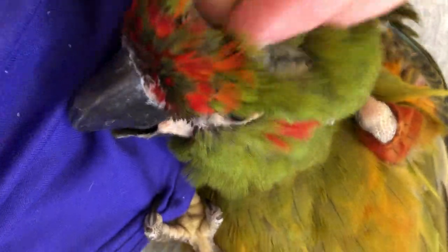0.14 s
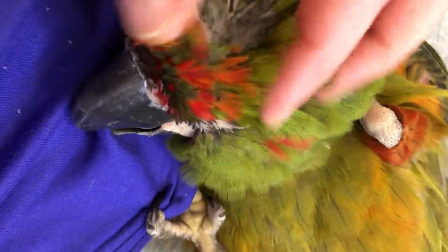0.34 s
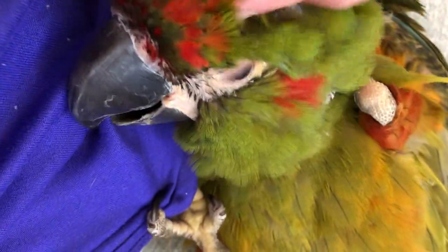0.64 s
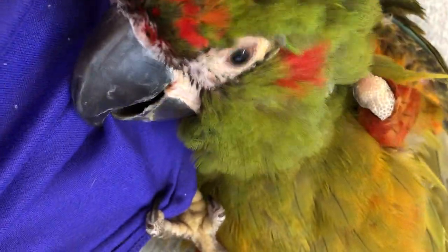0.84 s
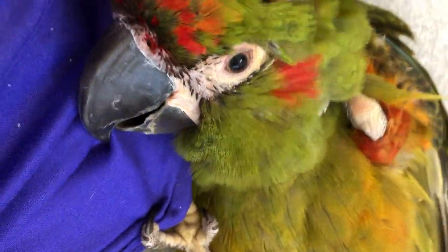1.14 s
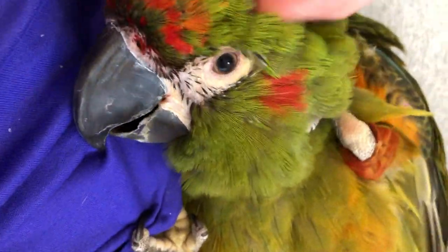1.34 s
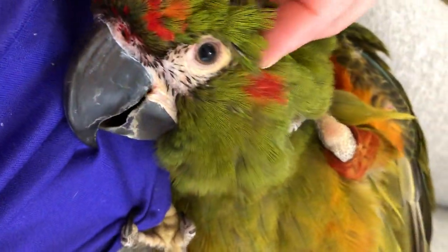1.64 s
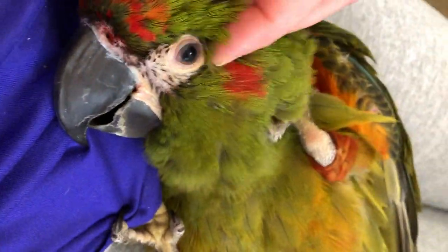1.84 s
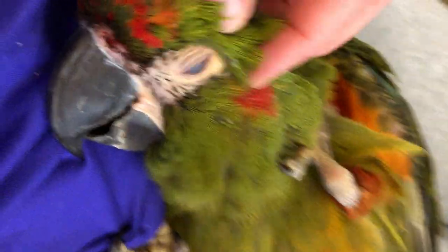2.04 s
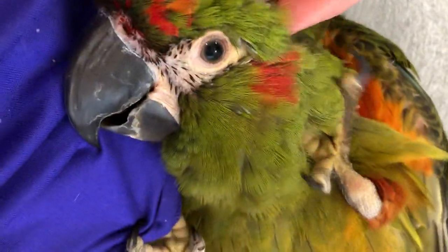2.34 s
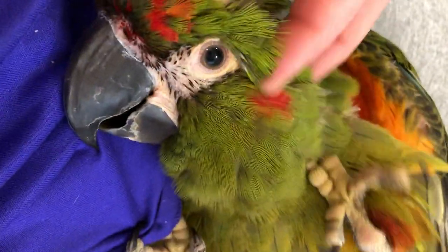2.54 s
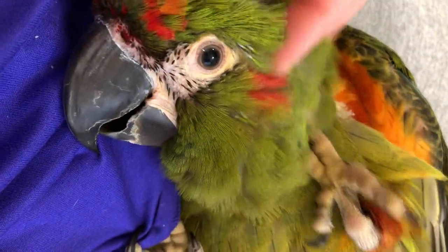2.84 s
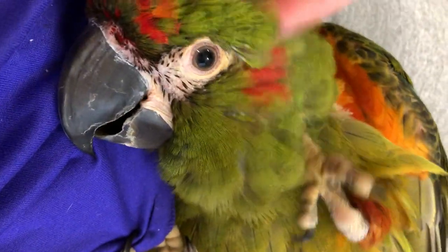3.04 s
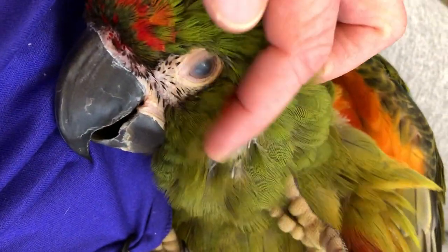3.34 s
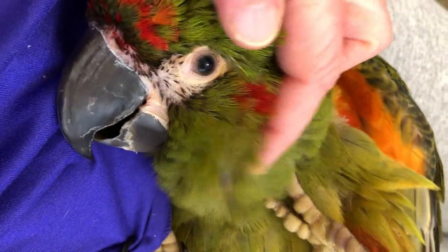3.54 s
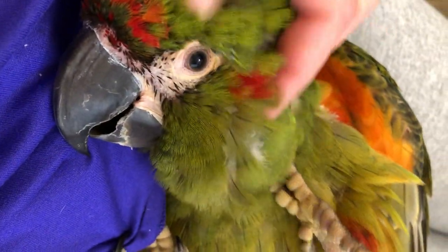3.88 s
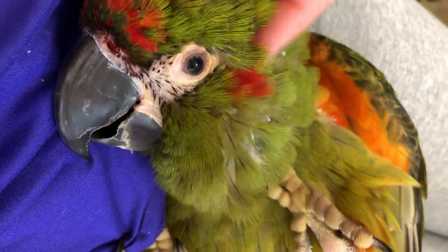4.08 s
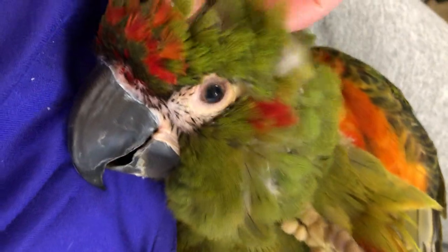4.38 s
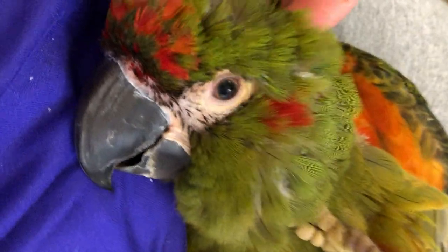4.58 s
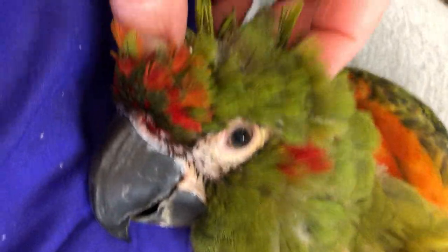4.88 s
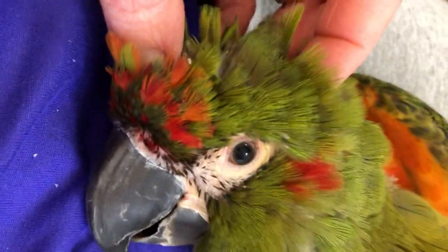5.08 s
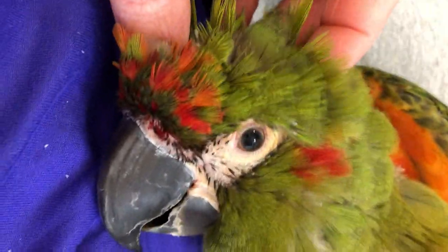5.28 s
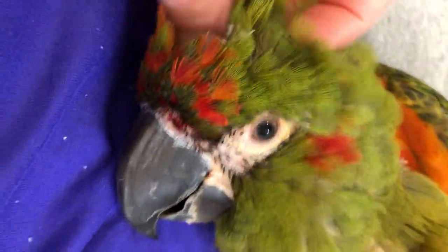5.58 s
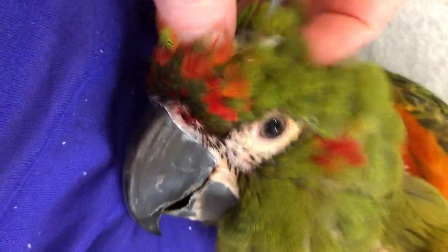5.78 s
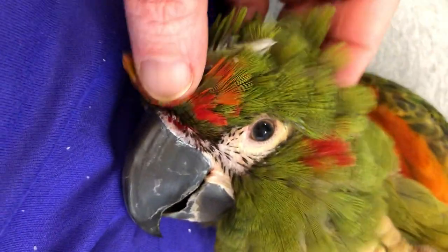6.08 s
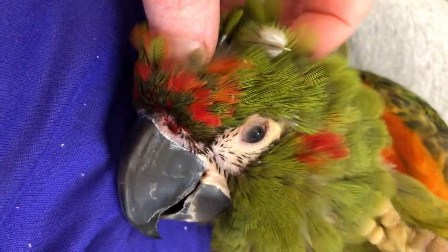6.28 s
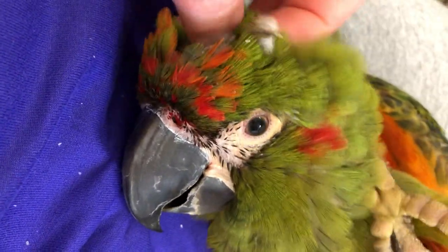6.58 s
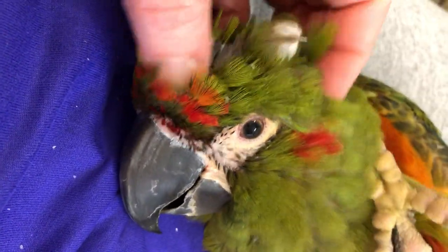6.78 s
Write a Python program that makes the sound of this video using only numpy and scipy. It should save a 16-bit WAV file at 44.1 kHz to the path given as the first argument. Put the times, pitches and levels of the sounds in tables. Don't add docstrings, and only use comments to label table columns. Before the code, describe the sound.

A quiet, hard-walled room with faint mains hum, low rumble and soft hiss. Light feather rubbing, ticks and knocks come first, close up; a sharp tick leads to two hard thumps and a softer one, ringing off the walls. After a lull, a young parrot peeps faintly, then louder, and squawks three times at an even pace, high and breathy. Afterwards only faint creaks, brushes and small bumps remain.

```python
import sys
import numpy as np
from scipy import signal
from scipy.io import wavfile
from scipy.ndimage import uniform_filter1d

SR = 44100
rng = np.random.default_rng(int(sys.argv[2]) if len(sys.argv) > 2 else 0)


def pcm_store(signal):
    levels = np.round(np.clip(np.atleast_2d(signal), -1, 1) * 32767)
    wavfile.write(sys.argv[1], SR, levels.astype(np.int16).T)


def decibels_to_gain(level_db):
    exponent = np.asarray(level_db, float) / 20
    return 10 ** exponent


N = 305172
EDGE_HZ = 15850


def evened(x):
    return x / np.sqrt(np.mean(x ** 2) + 1e-20)


def read(points, hz):
    f, value = np.transpose(points)
    return np.interp(np.log(hz + 1), np.log(f + 1), value)


def curves(rows):
    s, *columns = np.transpose(rows)
    t = np.arange(s[0], s[-1], 1 / SR)
    return s[0], [np.interp(t, s, column) for column in columns]


def add(mix, s, sound):
    part = mix[round(s * SR):][:len(sound)]
    part += sound[:len(part)]


def coloured(x, db_of):
    hz = abs(np.fft.fftfreq(4096, 1 / SR))
    log_gain = np.log(decibels_to_gain(np.maximum(db_of(hz), -100)))
    taps = np.fft.ifft(np.exp(np.conj(signal.hilbert(log_gain)))).real[:2048]
    return signal.fftconvolve(x, taps)


def slow(count, width):
    width = max(int(width), 1)
    once = uniform_filter1d(rng.standard_normal(count), width)
    return evened(uniform_filter1d(once, width))


def wash(spectrum, patchy_db, flicker_db):
    frames, hz = N // 128 + 5, np.fft.rfftfreq(512, 1 / SR)
    a, b, patches = rng.standard_normal((frames, 257, 3)).T
    patches = evened(uniform_filter1d(uniform_filter1d(patches, 24, 0), 16, 1))
    level_db = read(spectrum, hz)[:, None] + patchy_db * patches + flicker_db * slow(frames, 4.3)
    z = (a + 1j * b) * decibels_to_gain(level_db)
    return evened(signal.istft(z, nperseg=512, noverlap=384)[1][:N])


# time_s, level_db
STROKING = [(0.0, -57), (.26, -63.5), (.5, -60), (1.05, -65), (1.2, -63.5), (1.8, -67.5), (2.2, -66.5),
            (2.8, -68.5), (3.06, -66), (3.64, -67.5), (4.95, -66), (5.1, -54), (5.3, -73.5), (5.6, -66.5),
            (6.1, -70.5), (6.62, -70), (6.72, -61.5), (6.92, -69)]


def stroking():
    return np.interp(np.arange(N) / SR, *np.transpose(STROKING))


# pitch_hz, level_db
HISS = [(290, -24.5), (500, 2.5), (621, -39.5), (868, -4), (1030, -10.5), (1280, -3.5), (3700, -3),
        (4210, -3.5), (16000, -10)]


def hiss(stroke_db):
    feathers = decibels_to_gain(stroke_db) * wash(HISS, patchy_db=.6, flicker_db=1.2)
    capsule = decibels_to_gain(-79) * wash(HISS, patchy_db=-6.0, flicker_db=-1)
    return feathers + capsule


# pitch_hz, level_db
RUMBLE = [(47, -11.5), (80, 0), (86, -10), (113, -9.5), (247, -11), (371, -12), (409, -19), (651, -17.5),
          (1500, -30), (1950, -45), (3300, -120)]
RUMBLE_DB, RUMBLE_FOLLOWS = -65.5, .25
AFTER_THUMP_DB, AFTER_THUMP_T60_S = -30, 0.69


def rumble(stroke_db):
    t = np.arange(N) / SR
    level = decibels_to_gain(RUMBLE_DB + RUMBLE_FOLLOWS * (stroke_db - stroke_db.mean()))
    for s, peak_db, *_ in THUMPS:
        level += decibels_to_gain(peak_db + AFTER_THUMP_DB - 60 * (t - s) / AFTER_THUMP_T60_S) * (t > s)
    return level * wash(RUMBLE, patchy_db=2.0, flicker_db=1.5)


# centre_s, half_length_s, change_db
HUM_FALTERS = [
    (.0, 0.074, -1),
    (0.217, .05, 6.5),
    (.29, 0.037, -5),
    (.37, 0.028, 4),
    (0.43, 0.031, -6),
    (1.23, .05, -5),
    (2.41, .08, -12),
    (2.65, 0.1, -8),
    (4.56, 0.11, -5),
    (4.717, 0.068, -6),
]
HUM_HZ, HUM_WAVER_HZ, HUM_DB = 59.5, 2.2, -60.5


def hum():
    t = np.arange(N) / SR
    tone = np.sqrt(2) * np.sin(2 * np.pi * np.cumsum(HUM_HZ + HUM_WAVER_HZ * slow(N, 900)) / SR)
    falter_db = sum(db * np.exp(-((t - s) / half) ** 2) for s, half, db in HUM_FALTERS)
    return tone * decibels_to_gain(HUM_DB + falter_db + 1.1 * slow(N, 1500))


def burst(length):
    t = np.arange(4000) / SR
    spray = rng.standard_normal(len(t)) * np.exp(-t / length)
    return spray * np.minimum(t / (0.09 * length), 1)


def contact(peak_db, centre_hz, octaves, length):
    bell = lambda hz: -6 * np.abs(np.log2((hz + 20) / centre_hz) / octaves) ** 1.038
    ring = coloured(burst(length), bell)
    return decibels_to_gain(peak_db) * ring / abs(ring).max()


# start_s, peak_db, centre_hz, room_share_db
THUDS = [(.146, -49.5, 163, 6), (.195, -53, 210, -13), (.78, -54.5, 141, 3.5), (1.117, -50.5, 165, 4.5),
         (1.586, -33.5, 136, -5.5), (1.866, -36, 119, -3), (1.868, -43, 62, 8), (2.226, -31, 214, -3),
         (2.25, -44, 60, 3.5), (2.748, -61, 336, -7), (5.484, -51, 179, 2), (5.752, -53, 105, -6),
         (6.276, -53.5, 370, -3), (6.289, -55.5, 133, -3), (6.551, -44.5, 336, -3),
         (6.829, -46.5, 367, 6.5)]
KNOCKS = [(.441, -46.5, 870, -8), (.542, -42, 750, -6.5), (.656, -50.5, 880, -3), (1.424, -43, 650, 9),
          (1.585, -38, 1400, 13), (1.501, -35, 1320, 5), (2.189, -42, 840, -3), (3.663, -44, 1270, -3.5),
          (3.885, -37.5, 1510, -4), (6.834, -49, 1100, -0.5), (5.03, -58.5, 560, 14)]
TICKS = [(.4474, -48, 2380, -14), (.5427, -40, 3300, -7), (.6809, -47.5, 1980, -5),
         (1.3014, -62, 3620, -11), (1.3399, -25, 2600, -1.5), (1.34, -37.5, 990, -3),
         (1.4311, -33.5, 2540, 4), (1.929, -34, 3220, -8), (5.0918, -44, 1820, 1), (5.587, -58, 2200, -12),
         (6.049, -55, 2200, -7), (6.8744, -65, 3500, -8)]
SNAPS = [(.1461, -44, 1540, 1.5), (.8714, -47.5, 2850, 6), (2.186, -37.5, 2930, -6.5),
         (2.6005, -38.5, 3240, -8), (2.7164, -50, 4060, 0.5), (2.8883, -53, 2960, 6.5),
         (3.0594, -44, 3160, -7.5), (3.4371, -63.5, 3980, 18), (5.9502, -49, 4190, -22),
         (6.3235, -48.5, 2150, -15), (6.6528, -51, 3780, 6)]
RUSTLES = [(.4643, -54, 8300, -5), (.6, -43, 5240, 0.5), (1.0927, -50, 5100, -17), (1.2351, -57, 8680, -13),
           (4.088, -57, 6440, -13), (5.0874, -49, 4030, 4.5), (5.8638, -57, 8950, 4.5),
           (6.0533, -74, 4360, -10), (6.5834, -58, 11700, -13), (6.6504, -54, 6910, -6),
           (6.7137, -48.5, 8450, 2)]
BRUSHES = [(1.169, -51, 8510, -9), (1.3403, -29, 4340, -5), (1.5252, -34, 4970, -15),
           (2.8888, -52.5, 5830, 3.5), (2.9697, -40.5, 6600, -1.5), (3.059, -61, 4570, 9),
           (3.4376, -50, 5550, -10), (3.6884, -47.5, 4000, -10), (6.2598, -53, 7260, 5.5),
           (6.5211, -58, 4990, -14), (6.5445, -55, 5760, -11.5)]
SWEEPS = [
    (.8979, -39, 4600, -26),
    (2.04, -48.5, 3050, -12),
    (2.4075, -43, 4100, -9),
    (2.6, -48, 4070, -8),
    (4.151, -38.5, 1700, 4),
    (4.425, -39, 1724, -2.5),
    (4.7, -40, 1484, 1.5),
    (6.2544, -50, 2070, -7),
]
RINGS = [(.15, -52.5, 865, -5), (.447, -54, 890, -28), (.465, -59, 8200, -3), (.543, -60, 870, 10.5),
         (.655, -60, 900, -6), (1.502, -49, 1410, 8), (1.585, -52, 1610, 17), (3.887, -72, 875, 20.5),
         (4.446, -53.5, 1055, -1), (6.257, -45, 1980, -1.5), (6.257, -52, 2660, -2),
         (6.648, -50.5, 6640, -1), (6.872, -56, 3550, -12)]
PINGS = [
    (1.301, -49, 3620, -12),
    (1.585, -27, 4500, -25),
    (1.867, -26.5, 4650, -21),
    (3.662, -34.5, 3480, -8.5),
]


def contacts():
    near, far = np.zeros((2, N))
    kinds = [(THUDS, 0.58, 0.01), (KNOCKS, 0.69, .011), (TICKS, 0.34, 0.0049), (SNAPS, .92, 0.0098),
             (RUSTLES, .49, .012), (BRUSHES, 0.8, 0.016), (SWEEPS, 0.9, 0.04), (RINGS, .09, 0.022),
             (PINGS, 0.099, 0.0026)]
    for table, octaves, length in kinds:
        for s, peak_db, centre_hz, room_share_db in table:
            sound = contact(peak_db, centre_hz, octaves, length)
            add(near, s, sound)
            add(far, s, decibels_to_gain(room_share_db) * sound)
    return near, far


# start_s, peak_db, treble_tilt_db_per_octave, length_s
THUMPS = [
    (1.58, -17, 0.5, 0.011),
    (1.863, -18.5, 0.0, 0.0013),
    (2.221, -28.5, 0.0, 0.00092),
]
# pitch_hz, level_db
THUMP = [(24, -58), (40, -18.5), (158, 1.5), (359, -0.5), (427, -0.5), (606, -7.5), (670, -5.5), (797, -6),
         (949, -8), (1160, -13), (1520, -7.5), (3220, -19), (4350, -16.5), (9890, -31), (15500, -48)]


def thump(peak_db, tilt_db, length):
    blows = np.zeros(2000)
    at = np.cumsum(rng.integers(40, 200, 8))
    at = at - at[0]
    blows[at] = rng.choice([-1., 1.], 8) * np.exp(-at / SR / max(length, .001))
    blows[0] = 3
    blow = coloured(blows, lambda hz: read(THUMP, hz) + tilt_db * np.log2(hz / 1000 + 0.025))
    return decibels_to_gain(peak_db) * blow / abs(blow).max()


# pitch_hz, level_db
THROAT = [(760, -35), (1300, -19.5), (1630, -11.5), (2770, 4), (3380, -2.5), (4200, 1), (4900, -9.5),
          (5610, -6.5), (6760, -6), (7270, -13.5), (8320, -6.5), (10700, -20), (11700, -16), (13000, -28.5),
          (15500, -34.5)]


def squeak(rows):
    s, (hz, effort_db, rough, soft_db) = curves(rows)
    hz = hz * (1 + .09 * rough * slow(len(hz), 50))
    turns = np.cumsum(hz) / SR
    tone, power = np.zeros((2, len(hz)))
    for k in range(1, 11):
        height = decibels_to_gain(read(THROAT, k * hz) - soft_db * np.log2(k)) * (k * hz < EDGE_HZ)
        tone += height * np.cos(2 * np.pi * k * turns)
        power += height ** 2 / 2
    tone /= np.sqrt(power)
    flutter_db = 10 * rough * slow(len(hz), 200)
    return s, decibels_to_gain(effort_db + flutter_db) * tone * signal.windows.tukey(len(hz), .15)


# time_s, pitch_hz, effort_db
PEEPS = [
    [(3.722, 2790, -56), (3.735, 2460, -45.5), (3.75, 2233, -47), (3.772, 2313, -52.5), (3.788, 2454, -49),
     (3.815, 2370, -47.5), (3.845, 2410, -97)],
    [(3.853, 3500, -52), (3.872, 2905, -37), (3.878, 3190, -28.5), (3.89, 3190, -38.5), (3.902, 2880, -85)],
]
PEEP_ROUGH, PEEP_SOFT_DB, BRIGHTER_PER_DB = 0.15, -12, 0.27


def peep(rows):
    return squeak([(s, hz, db, PEEP_ROUGH, PEEP_SOFT_DB - BRIGHTER_PER_DB * db) for s, hz, db in rows])


# pitch_hz, level_db
RASP = [(240, -46.5), (400, -31.5), (1170, -16.5), (2470, 7.5), (2970, 3), (3970, -3.5), (4350, -1.5),
        (5070, 1.5), (8670, -6.5), (15500, -32.5)]


def rasp(rows):
    s, (level_db,) = curves(rows)
    count = len(level_db)
    strands_db = 3.5 * rng.standard_normal(90)
    strand_hz = np.linspace(0, SR / 2, len(strands_db))
    colour = lambda hz: read(RASP, hz) + np.interp(hz, strand_hz, strands_db)
    slaps = rng.standard_normal(count) * (.25 + (rng.random(count) < .06))
    air = evened(coloured(slaps, colour)[:count])
    return s, decibels_to_gain(level_db + 0.81 * slow(count, 60)) * air * signal.windows.tukey(count, .08)


# start_s, rise_s, peak_db, length_s
RASPS = [
    (3.882, 0.00507, -26.5, 0.029),
    (4.146, 0.029, -32.5, 0.14),
    (4.442, .01, -29, 0.19),
    (4.708, .03, -27.5, 0.11),
]
RASP_START_DB, RASP_FALL_S, RASP_LINGER_DB, RASP_END_DB = -16.5, .04, -56.5, -51.5


def gasp(start, rise, peak_db, length):
    fallen = min(rise + RASP_FALL_S, .9 * length)
    return rasp([(start, peak_db + RASP_START_DB), (start + rise, peak_db), (start + fallen, RASP_LINGER_DB),
                 (start + length, RASP_END_DB)])


# start_s, length_s, first_hz, last_hz, effort_db
WHISTLES = [
    (4.173, 0.045, 3340, 2640, -29),
    (4.443, 0.017, 2490, 2410, -43),
    (4.45, .04, 3256, 3224, -30.5),
    (4.708, 0.04, 2370, 2490, -48),
    (4.722, 0.045, 3495, 3900, -33),
]
WHISTLE_BEND, WHISTLE_SWELL_DB, WHISTLE_ROUGH, WHISTLE_SOFT_DB = 2.2, 10, .2, 8


def whistle(start, length, first_hz, last_hz, effort_db):
    u = np.linspace(0, 1, 9)
    hz = first_hz + (last_hz - first_hz) * u ** WHISTLE_BEND
    swell_db = effort_db + WHISTLE_SWELL_DB * (u - .5)
    return squeak(np.transpose([start + length * u, hz, swell_db, WHISTLE_ROUGH + 0 * u, WHISTLE_SOFT_DB + 0 * u]))


# start_s, length_s, held_hz, sag_hz_per_s, effort_db
SQUAWKS = [
    (4.209, 0.12, 1651, 51, -28.5),
    (4.48, .118, 1623, 500, -28.5),
    (4.754, .12, 1637, 619, -30),
]
BREAK_RATIO, FALL_S, BREAK_DB, BREAK_SOFT_DB, BREAK_ROUGH = 1.33, .02, -2, -3, .3
SLACK_S = 0.013
CLOSE_S, CLOSE_RATIO, CLOSE_DB, CLOSE_SOFT_DB = .016, 0.873, -4, 5.5
RATTLE_HZ, RATTLE_DB, RATTLE_S = 230, 5, .06
SWELL_DB, HELD_SOFT_DB, SQUAWK_ROUGH = 3, 0.55, .07


def squawk(start, length, held_hz, sag_hz, effort_db):
    t = np.arange(0, length, .0005)
    fresh = np.exp(-(t / (FALL_S + SLACK_S * sag_hz / 1000)) ** 2)
    closing = np.clip(1 - (length - t) / CLOSE_S, 0, 1)
    hz = (held_hz - sag_hz * t) * BREAK_RATIO ** fresh * CLOSE_RATIO ** closing
    rattle_hz = RATTLE_HZ * (1 + .2 * slow(len(t), 12))
    rattle = np.cos(2 * np.pi * np.cumsum(rattle_hz) * (t[1] - t[0]))
    level_db = effort_db + BREAK_DB * fresh + CLOSE_DB * closing + SWELL_DB * t / length
    level_db = level_db + RATTLE_DB * rattle * np.exp(-(t / RATTLE_S) ** 2)
    soft_db = HELD_SOFT_DB + BREAK_SOFT_DB * fresh + CLOSE_SOFT_DB * closing
    return squeak(np.transpose([start + t, hz, level_db, SQUAWK_ROUGH + BREAK_ROUGH * fresh, soft_db]))


# time_s, pitch_hz, level_db
MOANS = [
    [(4.93, 438, -83), (4.938, 460, -71), (4.97, 401, -58), (5.0, 403, -75)],
    [(5.0, 215, -73), (5.014, 209, -61), (5.118, 220.5, -62.5), (5.124, 207, -57), (5.17, 211, -70)],
]


def moan(rows):
    s, (hz, level_db) = curves(rows)
    tone = np.sin(2 * np.pi * np.cumsum(hz) / SR) * signal.windows.tukey(len(hz), .3)
    return s, decibels_to_gain(level_db + 3.5 + 1.7 * slow(len(hz), 300)) * tone


# pitch_hz, t60_s
ROOM = [(100, 0.42), (260, 0.5), (700, 0.39), (1840, 0.33), (4850, 0.32), (12000, 0.28)]


def room(x):
    taps = np.zeros(SR)
    at = np.arange(140, SR - 20, 20)
    taps[at + rng.integers(0, 20, len(at))] = rng.choice([-1., 1.], len(at))
    hz, t, z = signal.stft(taps, SR, nperseg=512)
    tail = signal.istft(z * decibels_to_gain(-60 * t / read(ROOM, hz)[:, None]), SR, nperseg=512)[1]
    return signal.fftconvolve(x, tail / np.linalg.norm(tail))[:N]


def scene():
    bird, blows = np.zeros((2, N))
    stroke_db = stroking()
    ground = hiss(stroke_db) + rumble(stroke_db) + hum()
    near, far = contacts()
    for s, *row in THUMPS:
        add(blows, s, thump(*row))
    for rows in PEEPS:
        add(bird, *peep(rows))
    for voice, table in ((gasp, RASPS), (whistle, WHISTLES), (squawk, SQUAWKS)):
        for row in table:
            add(bird, *voice(*row))
    for rows in MOANS:
        add(near, *moan(rows))
    direct = decibels_to_gain(-4) * bird + decibels_to_gain(-4) * blows + near
    echoes = room(bird + decibels_to_gain(12.0) * blows + far)
    return (direct + echoes + ground)[None]


def roll_off(x):
    return signal.sosfilt(signal.butter(12, 16400, fs=SR, output="sos"), x)


def record(dry):
    heard = signal.sosfilt(signal.butter(2, 45, "highpass", fs=SR, output="sos"), dry)
    band = signal.firwin(511, EDGE_HZ, window=("kaiser", 9), fs=SR)
    heard = signal.oaconvolve(heard, band[None], "same")
    return roll_off(heard)


dry = scene()
out = record(dry)
pcm_store(out)
```